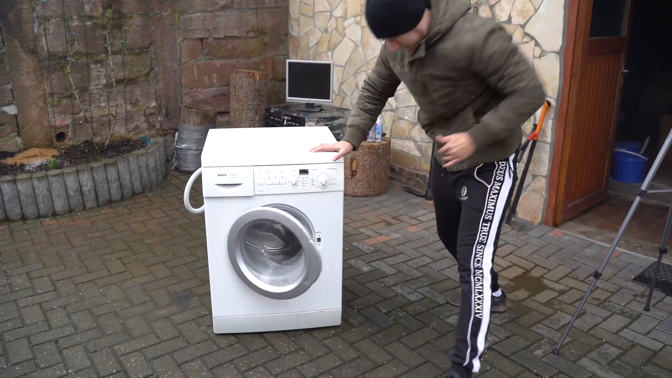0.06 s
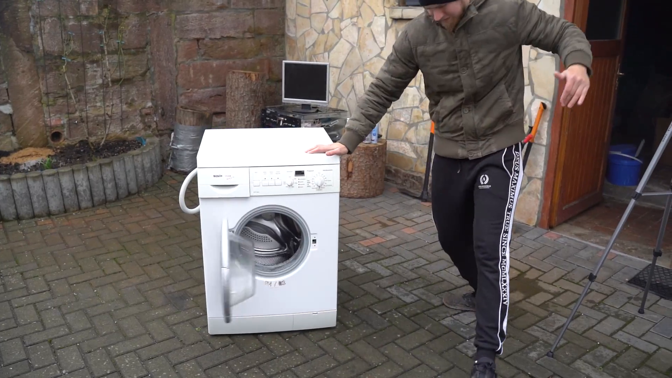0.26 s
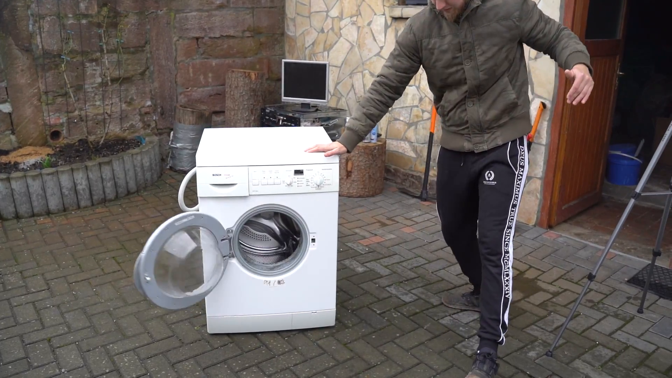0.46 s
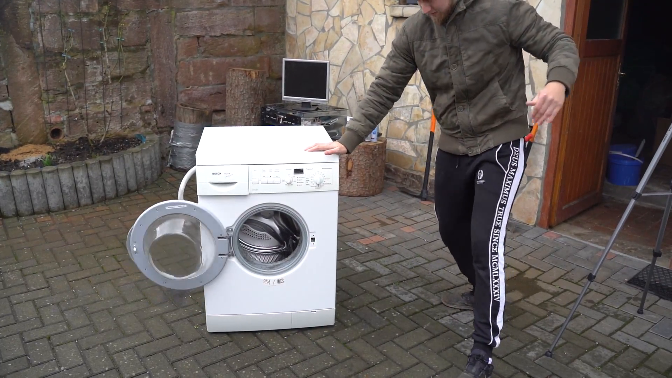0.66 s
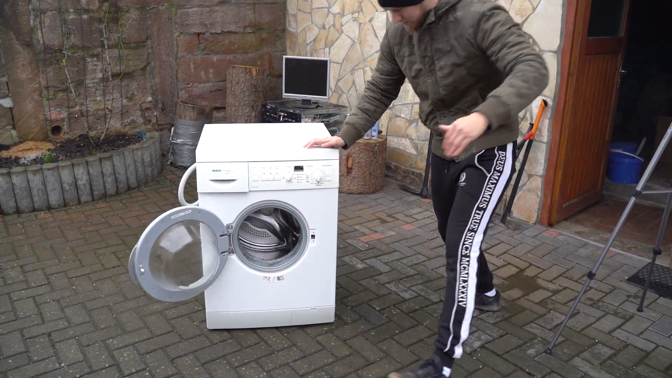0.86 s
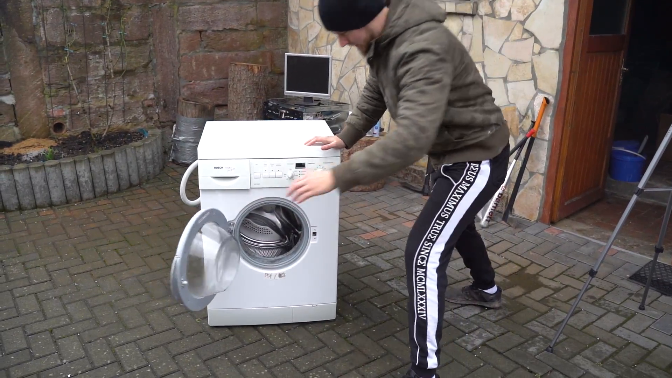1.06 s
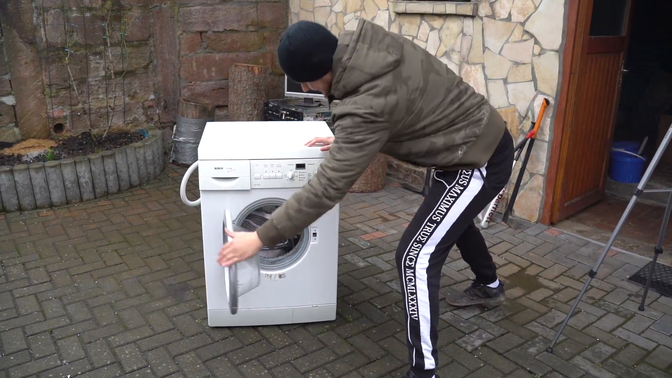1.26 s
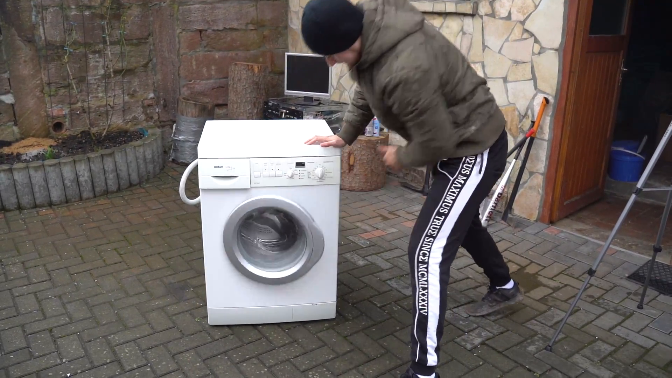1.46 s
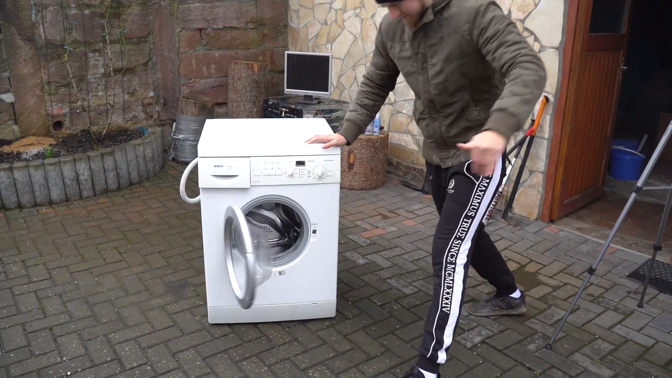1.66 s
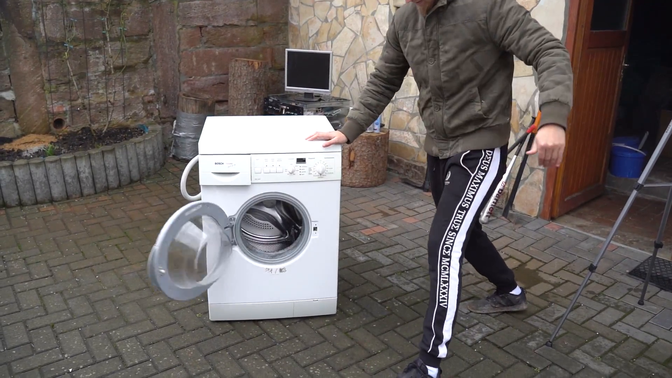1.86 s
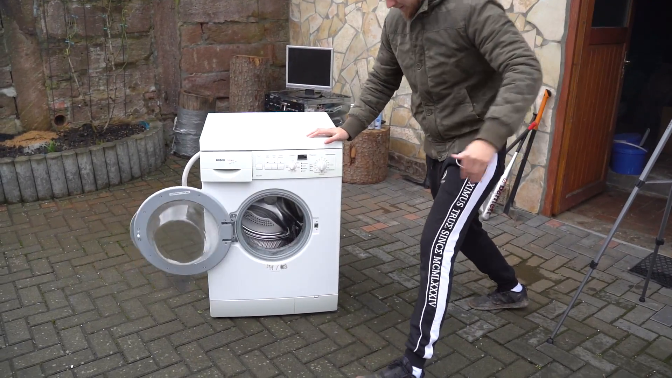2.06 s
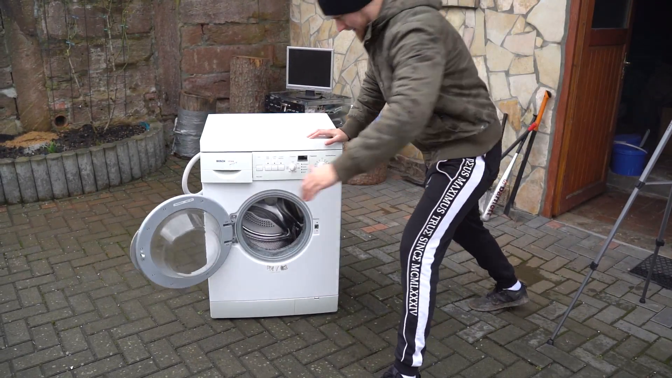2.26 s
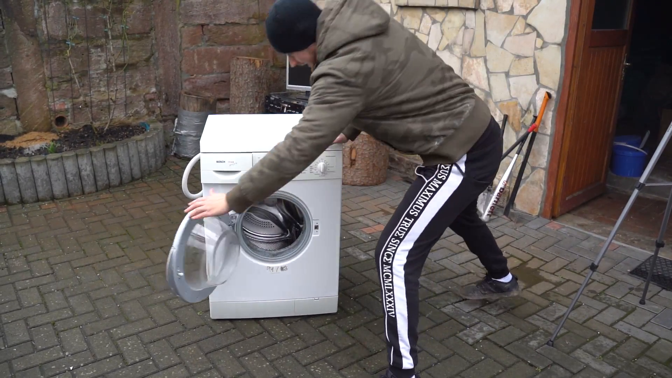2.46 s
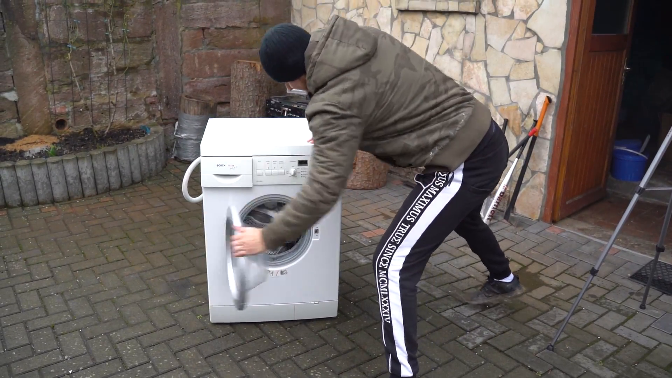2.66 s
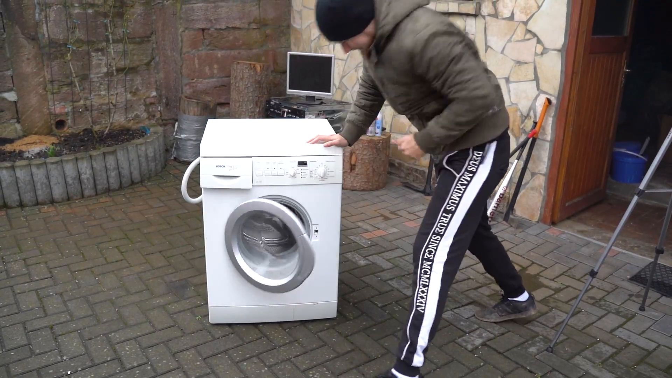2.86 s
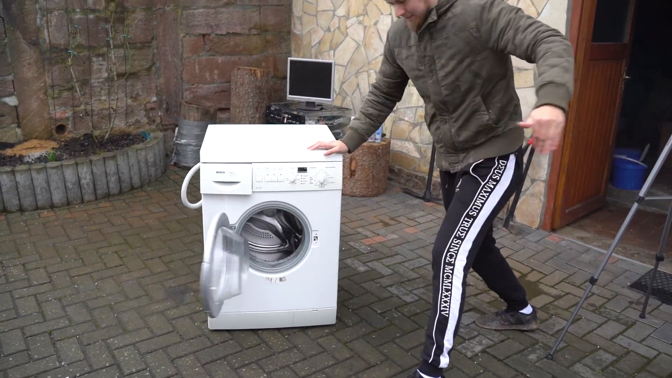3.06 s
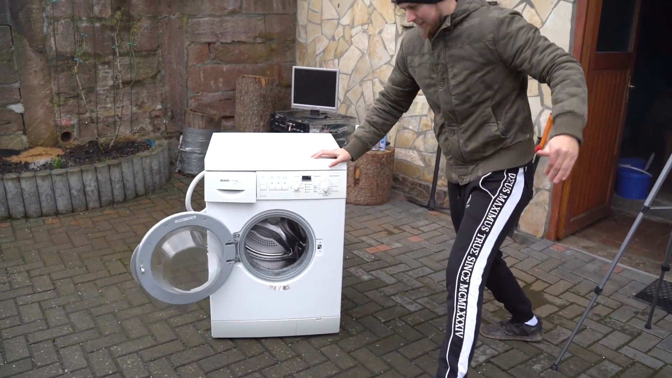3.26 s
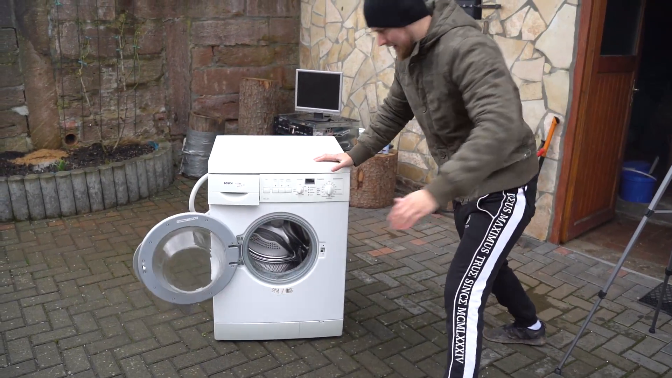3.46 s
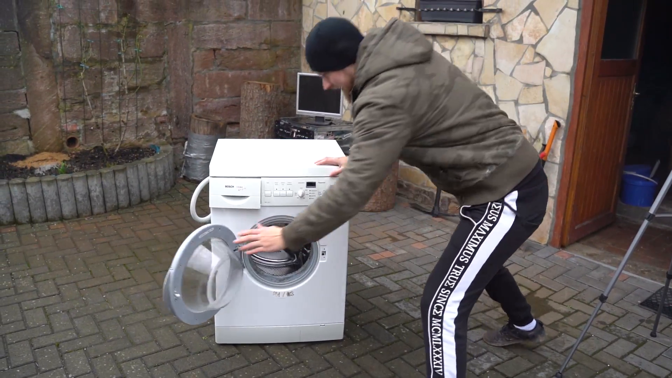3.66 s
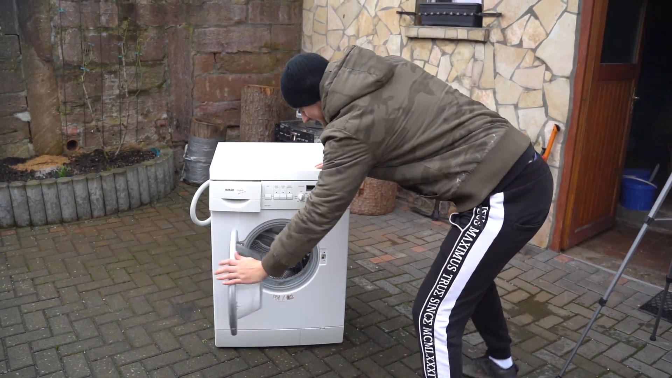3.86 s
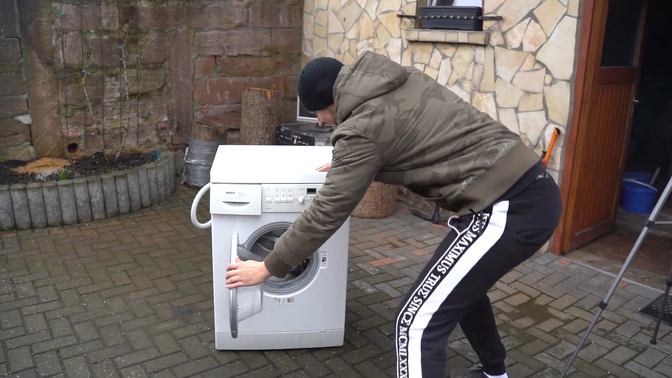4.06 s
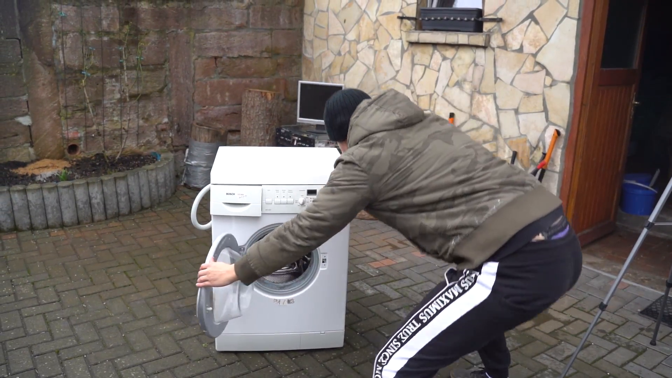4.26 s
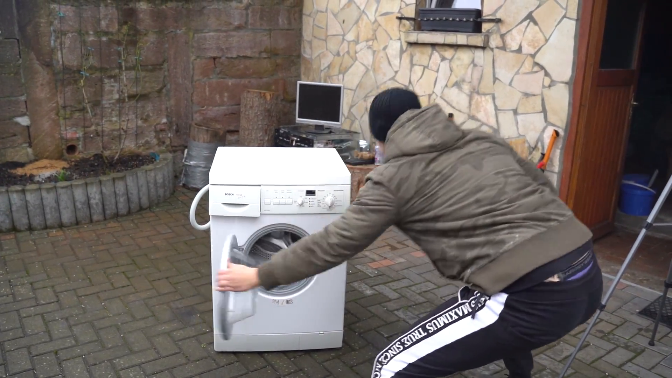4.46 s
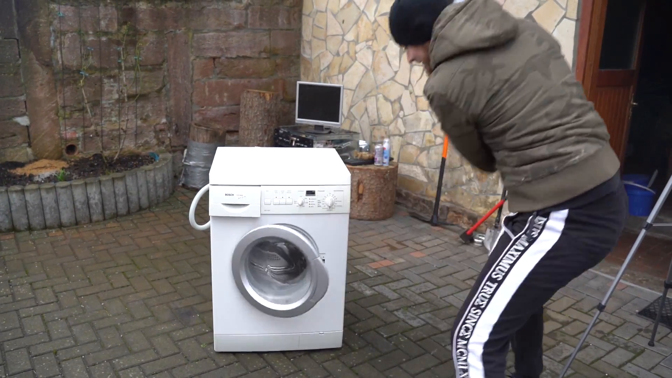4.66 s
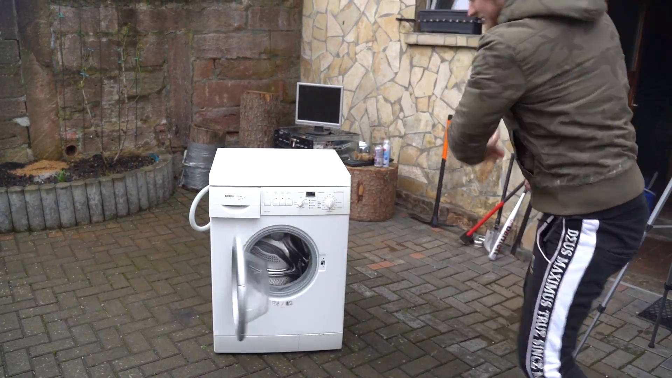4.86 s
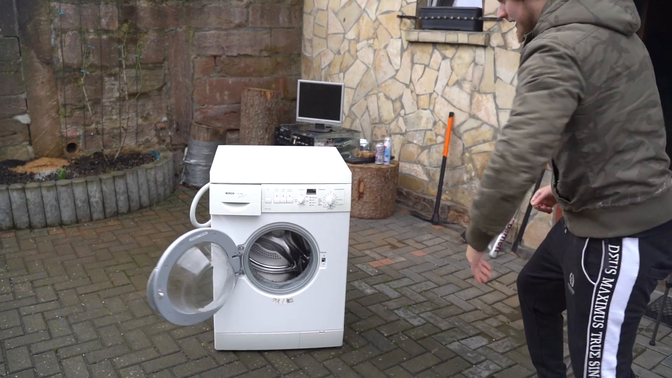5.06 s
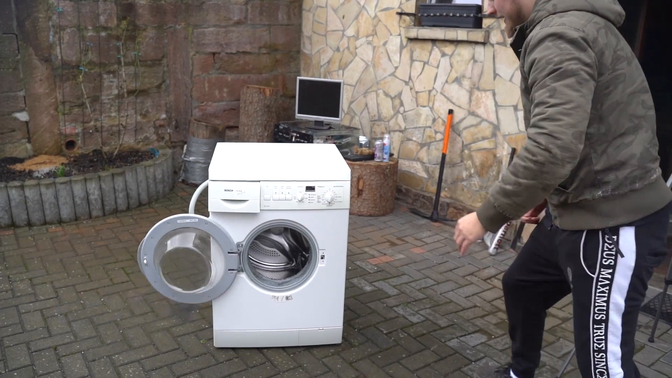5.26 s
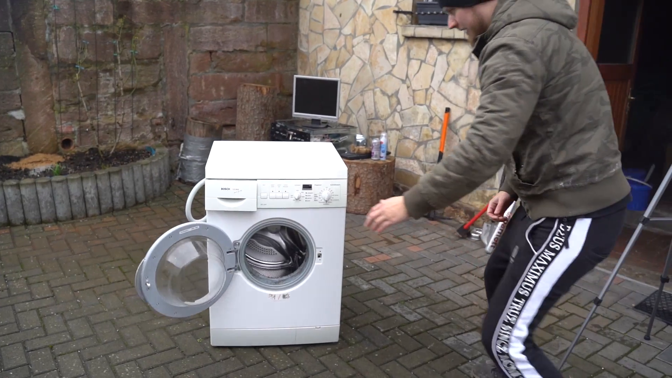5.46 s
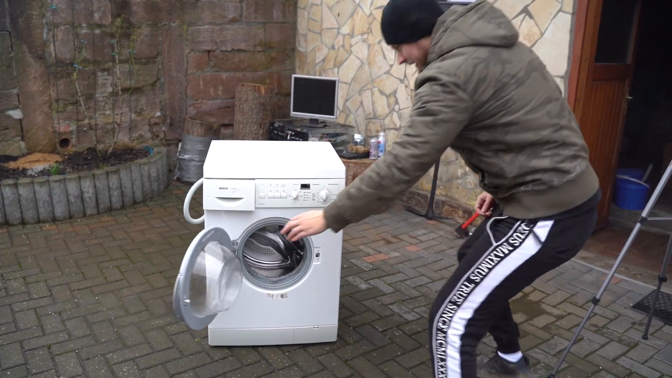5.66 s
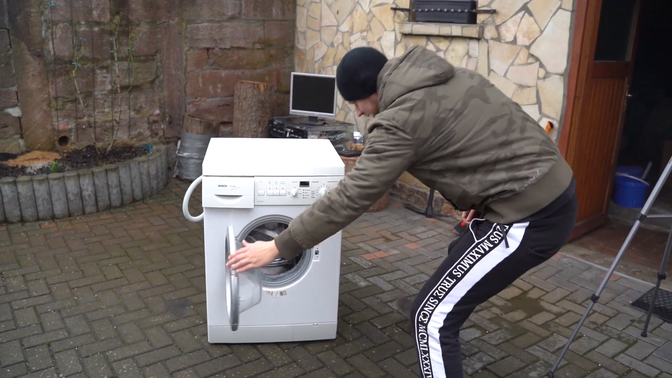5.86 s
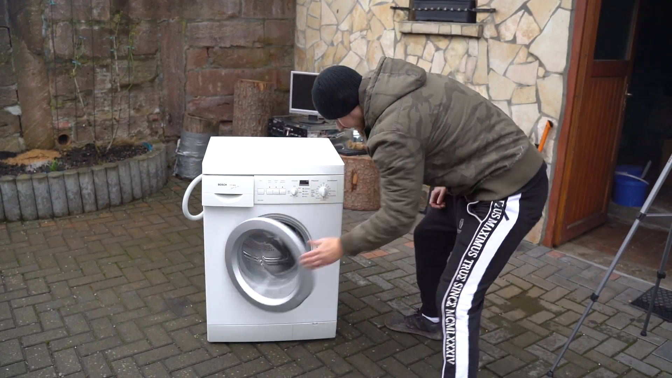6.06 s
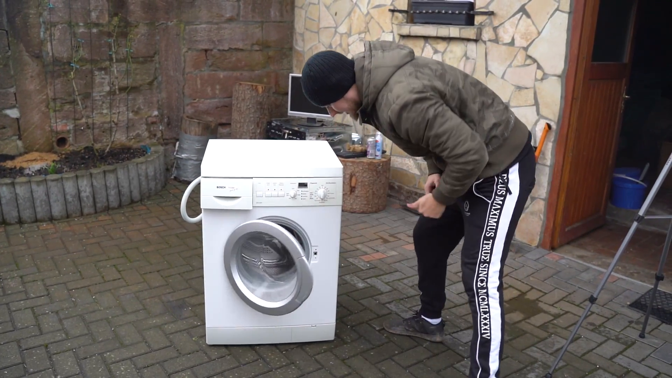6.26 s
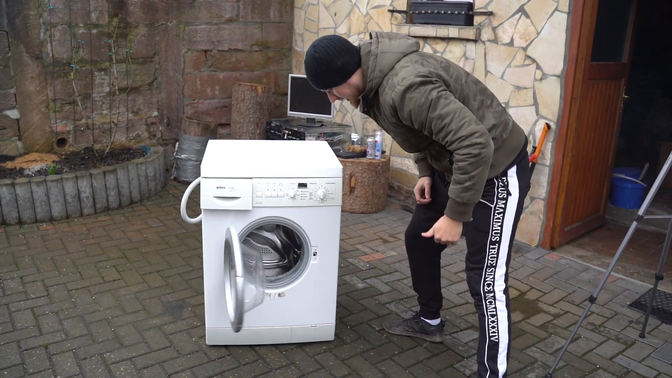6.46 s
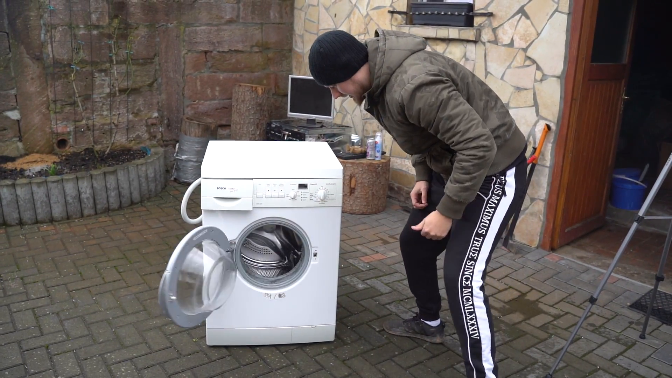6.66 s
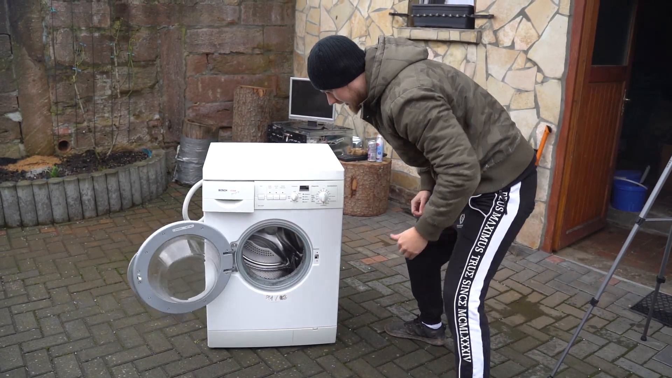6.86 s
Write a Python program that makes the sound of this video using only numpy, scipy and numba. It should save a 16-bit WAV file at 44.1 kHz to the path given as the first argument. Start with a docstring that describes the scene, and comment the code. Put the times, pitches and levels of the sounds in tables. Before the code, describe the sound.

A washing machine stands close to the stereo microphone, slightly left, in a paved yard. At once, at 0.03 s, its round door slams: sharp crack, ringing sheet metal, a swelling low boom and rattling decay of about a third of a second. Near 0.7 s the rebounding door ticks and thuds softly on its hinge stop. A dull hand contact and scuff around 1.36 s lead to the second slam at 1.49; hinge knock at 2.13. Third slam at 2.82, knock at 3.4. Faint falling bird chirps follow around 4 s. At 4.4 a rubber sole skids gritty and squeaky on the right, leaving a thin whistling ring, then a fourth, bright slam at 4.65. A weaker hinge knock comes at 5.3, rubbing at 5.66, and a clearly lighter fifth slam at 6.18, dying into faint traffic and a wavering hum until about 6.9 s.

```python
"""Washing machine door slammed in a yard

The round door is slammed by hand in a paved yard, springs back and hits its hinge stop.
Blows sum noise cracks, ringing cabinet modes, swelling low booms and a rattle of decaying noise bands.
Shoes scuff and skid (shaped noise, one thin whistling ring), small birds call (gliding sines), distant
traffic (noise) and a hum (two sines) fill the gaps; a limiter holds the slams."""
import sys
import numpy as np
from scipy import signal
from scipy.io import wavfile
from scipy.ndimage import uniform_filter1d
from numba import njit

SR = 44100
rng = np.random.default_rng(int(sys.argv[2]) if len(sys.argv) > 2 else 0)


def dump_mix(stems):
    """Bounce the given channels to the path in sys.argv[1] as a 16-bit WAV at rate SR."""
    frames = np.atleast_2d(stems).T  # one column per channel
    limited = np.clip(frames, -1, 1)  # hard clip at full scale
    pcm = np.round(limited * 32767).astype(np.int16)
    wavfile.write(sys.argv[1], SR, pcm)


N = 304290
BANDS = 32 * 2 ** np.arange(0, 9.2, 1 / 3)  # third-octave centres, f/Hz
BLIP_PEAK_S = 4000 / SR  # where a blip peaks in its own buffer

# door meets the frame: t/s, force/dB, contact sharpness re force/dB, seal squeeze/dB
DOOR_SLAMS = [(0.031, -1, 4, 2.5), (1.485, -0.5, -2, 0.5), (2.820, -0.5, 0, -1), (4.645, -2, 5, 1),
              (6.177, -7.5, 4, -5)]
# door swung wide against the hinge stop: t/s, force/dB, open-door shudder/dB, ring of door and panels/dB
HINGE_STOPS = [(0.687, 1, -19, 1), (2.127, 0.5, -18, -1), (3.401, 0, -17, -0.5), (5.292, -2.5, -21, -8)]
# thin whistles, bird peeps and one ring after the skid: t/s, length/s, first f/Hz, fall/Hz, level/dB
WHISTLES = [(0.357, .04, 6250, 0, -74), (0.426, .035, 5800, -450, -73), (0.507, .038, 5930, -250, -72),
            (0.6, .04, 5950, -200, -77), (3.57, .065, 5590, 350, -70), (4.464, 0.077, 7200, 0, -55),
            (6.81, 0.057, 7800, 100, -85)]
SKID_RING_ROW = 5  # row of WHISTLES that is the ring after the skid
TICK_DB, KNOCK_DB, KNOCK_S = -36.5, -34.5, 0.014  # stop: levels re force; knock delay after the tick
SKID_PAN_DB = -4.5  # left minus right: skids lie right of the microphone


def undb(db):
    """Amplitude factor of a level in dB."""
    return np.exp(np.asarray(db) * np.log(10) / 20)


def unit(x):
    """Scale to rms 1."""
    return x / np.sqrt(np.mean(x ** 2))


def add(out, s, x):
    """Mix x into out from s seconds on."""
    i = int(s * SR)
    i, x = max(i, 0), x[..., max(-i, 0):]
    out[..., i:i + x.shape[-1]] += x[..., :out.shape[-1] - i]


def left_right(pan_db):
    """Column of channel levels in dB, left minus right = pan_db."""
    return np.array([[pan_db], [-pan_db]]) / 2


def band(hz, width_hz, like, size=N, order=2):
    """Stereo noise band, rms 1; its channels correlate by the share like (0-1)."""
    edges_hz = np.clip([hz - width_hz / 2, hz + width_hz / 2], 15, 20000)
    bandpass = signal.butter(order, edges_hz, "band", fs=SR, output="sos")
    mid, side = signal.sosfilt(bandpass, rng.standard_normal((2, size)))
    like = np.clip(like, 0, 1)
    return unit(np.sqrt(1 + like) * mid + np.sqrt(1 - like) * side * np.array([[1], [-1]]))


def swell(rise_s, t60_s, size):
    """Envelope with an exponential rise and a 60 dB fall per t60; top 1."""
    t = np.arange(size) / SR
    e = (1 - np.exp(-t / rise_s)) * np.exp(-np.log(1000) * t / t60_s)
    return e / e.max()


def walk(rate_hz, size=N):
    """Random levels held 1 / rate and smoothed twice; rms 1."""
    k = int(SR / rate_hz)
    steps = np.repeat(rng.standard_normal(size // k + 1), k)
    return unit(uniform_filter1d(uniform_filter1d(steps, k), k)[:size])


def by_band(table, column):
    """One column of a (f/Hz, ..) table interpolated over log f at the band centres."""
    table = np.array(table)
    return np.interp(np.log(BANDS), np.log(table[:, 0]), table[:, column])


def traffic():
    """Noise bands that swell together and flicker alone; the lows are near mono."""
    # spectrum: f/Hz, relative density/dB per Hz
    spectrum = [(15, -35), (25, -5.5), (62, -7), (88, -14), (123, -8.5), (195, -16.5), (263, -9.5),
                (439, -15.5), (531, -13), (641, -11.5), (1070, -11), (3080, -29.5), (7110, -38),
                (16000, -55)]
    # overall: t/s, level/dB
    course = [(0, -53), (4, -56.5), (6.9, -59.5)]
    out, slow = np.zeros((2, N)), walk(0.8)
    for hz, density_db in zip(BANDS, by_band(spectrum, column=1)):
        level = undb(density_db + 0.32 * slow + 1.3 * walk(8.7)) * np.sqrt(hz)  # density to band level
        out += level * band(hz, 0.23 * hz, 1 - hz / 1200)
    return unit(out) * undb(np.interp(np.arange(N) / SR, *np.transpose(course)))


def hum():
    """Distant fundamental and octave, wavering in pitch and level."""
    # t/s, fundamental level/dB, octave level/dB
    course = [(0, -65.5, -74), (1.2, -63, -86), (3.6, -84.5, -72), (4.0, -83, -67.5), (4.6, -72, -62),
              (5.3, -74, -79), (5.9, -64, -78.5), (6.5, -68, -79), (6.9, -66.5, -74.5)]
    t = np.arange(N) / SR
    s, low_db, high_db = np.transpose(course)
    phase = 2 * np.pi * np.cumsum(268.6 * (1 + 0.008 * walk(22))) / SR
    out = np.zeros(N)
    for k, db in ((1, low_db), (2, high_db)):
        out += undb(np.interp(t, s, db) + 0.83 * walk(14)) * np.sin(k * phase)
    return np.sqrt(2) * out  # dB are rms


def seal(squeeze_db):
    """Rubber seal rubs (noise), then shuts as the drum air kicks back (one windowed low swing)."""
    rub_db, puff_db = -38.5, -17.5  # re squeeze
    out = np.zeros((2, 2000))
    add(out, 0, undb(squeeze_db + rub_db) * band(1300, 1100, 0.6, size=1500) * swell(0.004, 1.2, size=1500) ** 2)
    puff = -np.sin(2 * np.pi * np.arange(560) / 480) * np.hanning(560)
    add(out, 0.0205, undb(squeeze_db + puff_db) * puff)
    return out


def crack(db, hz, width_hz):
    """Hard contact: a noise band lasting a few milliseconds."""
    return undb(db) * band(hz, width_hz, 0.29, size=2000) * swell(0.0006, 0.009, size=2000)


def cabinet(db, contact_s, chatter_t60_s):
    """Panel modes ring after a push and the loose knocks that follow; each channel hears its own mix."""
    # cabinet panels, door ring and glass: f/Hz, level/dB, t60/s
    modes = [(43.3, -19, 0.3), (67.8, -10.5, 0.55), (99, -3, 0.22), (148.4, -5.5, 0.48), (185, -6.5, 0.26),
             (252, -10, 0.12), (268.6, -6.5, 0.29), (323.8, -6.5, 0.34), (334.9, -4.5, .2),
             (366.7, -2, 0.2), (387.5, -8.5, .16), (594, -17, 0.16), (724, -12, 0.1), (789.4, -7, 0.31),
             (1210, -14.5, 0.35), (1470, -15.5, .15), (1920, -16.5, .15), (2260, -12.5, .12),
             (2950, -20.5, .12), (3670, -21.5, .12), (4410, -23, .1), (5274, -25.5, .1), (7010, -25, .08)]
    hz, mode_db, t60_s = np.transpose(modes)[:, :, None]
    chance = rng.standard_normal((3, len(hz), 1))  # level, phase, place
    t = np.arange(SR // 2) / SR
    spread = np.minimum(hz / 900, 1.6) * chance[2]  # small parts sound from different places
    drift = 0.05 * np.cumsum(rng.standard_normal((len(hz), len(t))), axis=1)  # loose joints blur each pitch
    fade = undb(mode_db + chance[0] - 60 * t / t60_s)
    phase = 2 * np.pi * hz * t + 9 * chance[1] + drift
    ring = [(fade * np.sin(phase + side * spread)).sum(axis=0) for side in (0.5, -0.5)]
    hits = rng.random(len(t)) < 250 / SR  # 250 knocks per second
    knocks = hits * rng.standard_normal(len(t)) * 10 ** (-3 * t / chatter_t60_s)
    knocks[0] = 2.5  # the push itself
    push = np.hanning(int(contact_s * SR) + 3)
    force = np.convolve(knocks / np.sqrt(np.sum(knocks ** 2)), push / push.sum())
    return undb(db) * signal.fftconvolve(ring, force[None], axes=1)


def boom(db, hz, peak_s, sharp):
    """Wavering tone fed by the blow, peaks late and dies; the walls shift its phase between channels."""
    u = np.arange(SR // 2) / SR / peak_s
    phase = 2 * np.pi * np.cumsum(hz * (1 + 0.045 * walk(35, size=len(u)))) / SR
    apart = 0.094 * walk(20, size=len(u)) * np.array([[1], [-1]])
    level = undb(db + 2.2 * walk(45, size=len(u)))
    return level * np.sin(phase + apart) * (u * np.exp(1 - u)) ** sharp


def slams():
    """Door on frame: seal, hard crack, ringing panels, then booms of drum air and walls."""
    # air in the drum, then the walls: peak delay/s, f/Hz, level re drum/dB, sharpness
    swells = [(0.018, 105.5, 3.5, 1.6), (0.071, 159, -10, 4.5), (.04, 290, -9, 2.4), (0.1, 110, -19, 5.3)]
    crack_db, panels_db, drum_db = 9, -4, -0.8  # re force
    out = np.zeros((2, N))
    for s, force_db, sharp_db, squeeze_db in DOOR_SLAMS:
        add(out, s - 0.033, seal(squeeze_db))
        add(out, s, crack(force_db + sharp_db + crack_db, 2400, 3600))
        add(out, s, crack(force_db + sharp_db + crack_db - 10, 9800, 12000))
        add(out, s, cabinet(force_db + panels_db, 0.0002, 0.33))
        for peak_s, hz, db, sharp in swells:
            add(out, s, boom(force_db + drum_db + db, hz, peak_s, sharp))
    return out


def blip(db, hz, length_s, steep=1):
    """A cosine under a bell envelope, peak at BLIP_PEAK_S; steep shortens the rise."""
    t = np.arange(-4000, 4000) / SR
    bell = np.exp(-(2 * t * np.where(t < 0, steep, 1) / length_s) ** 2)
    return undb(db) * np.cos(2 * np.pi * hz * t) * bell


def stops():
    """Hinge stop: thin tick, dull knock, shudder of the open door, weaker rebound."""
    flap_s, rebound_s = 0.055, 0.155  # after the tick
    shake_db, rebound_db, flap_hz = -26.5, -16, 100.2  # re force, re shudder
    out = np.zeros((2, N))
    for s, force_db, shudder_db, ring_db in HINGE_STOPS:
        knock_db, body_db = force_db + KNOCK_DB, force_db + shake_db
        add(out, s, crack(force_db + TICK_DB + 8, 3600, 3100))
        add(out, s + 0.02 - BLIP_PEAK_S, blip(body_db - 3, 80, 0.039))  # the hinge takes the load
        add(out, s + KNOCK_S, crack(knock_db + 11, 3350, 3500))
        add(out, s + KNOCK_S, cabinet(body_db, 0.0018, 0.28))
        add(out, s + KNOCK_S, boom(knock_db + ring_db + 9, 366, 0.0055, 0.67))  # the hollow door ring
        add(out, s + flap_s - BLIP_PEAK_S, blip(shudder_db, flap_hz, 0.053, steep=2))
        add(out, s + flap_s - 0.016, cabinet(body_db + ring_db + 2.5, 0.002, 0.2))  # shaken panels
        add(out, s + rebound_s - BLIP_PEAK_S, blip(shudder_db + rebound_db, 1.056 * flap_hz, 0.045))
    return out


def rattle():
    """Loose parts and yard echoes: noise bands set off by every blow, each dying at its own pace."""
    # f/Hz, level per band/dB, t60/s, left-right likeness (0-1)
    decay = [(50, -29, 0.65, 0.99), (94, -15, 0.46, 0.98), (195, -10, 0.39, 0.95), (474, -11.5, 0.35, 0),
             (1000, -7, .28, 0.7), (2040, -6.5, 0.3, .2), (4500, -10, 0.32, 0), (7960, -9, 0.26, 0.02),
             (15000, -14, 0.2, 0)]
    yard_db, yard_longer = -33, 1.605  # late echoes: level, t60 factor
    treble_left_db = 1  # the near wall sends more treble to the left
    # blows: t/s, level/dB, low cut/dB per octave, treble cut/dB per octave, t60 factor
    blows = [(s, force_db - 0.5, 0, 0, 1) for s, force_db, _, _ in DOOR_SLAMS]
    for s, force_db, _, _ in HINGE_STOPS:
        blows.append((s, force_db + TICK_DB, 4, 1.5, 0.6))
        blows.append((s + KNOCK_S, force_db + KNOCK_DB, -1, 2.5, 0.8))
    out, clatter = np.zeros((2, N)), walk(150)
    for hz, db, t60_s, like in zip(BANDS, *(by_band(decay, column=k) for k in (1, 2, 3))):
        envelope = np.zeros(N)
        for s, blow_db, thin_db, dull_db, short in blows:
            tilt_db = thin_db * min(np.log2(hz / 2000), 0) - dull_db * max(np.log2(hz / 4000), 0)
            near = swell(0.00032 + 0.88 / hz, short * t60_s, size=30000)  # lows come late
            late = undb(yard_db) * swell(0.02, yard_longer * short * t60_s, size=30000)
            add(envelope, s, undb(blow_db + tilt_db + db) * (near + late))
        lean_db = left_right(treble_left_db * (hz > 6000))
        flicker = undb(1.1 * clatter + 1.5 * walk(60) + lean_db)
        out += envelope * flicker * band(hz, 0.25 * hz, like)
    return out


def door():
    """All door blows; the left channel leads, as the machine stands a little left of the microphone."""
    out = slams() + stops() + rattle()
    out[0] = np.roll(out[0], -2)
    return out


def scrape(db, hz, width_hz, rise_s, t60_s, pan_db):
    """Friction: a noise band with a grainy level."""
    grain = undb(db + 2 * walk(300, size=20000) + left_right(pan_db))
    return grain * band(hz, width_hz, 0.3, size=20000, order=3) * swell(rise_s, 2 * t60_s, size=20000) ** 2


def scuffs():
    """Light rubbing of shoes, hands and cloth: broad scrapes."""
    # t/s, level/dB, centre f/Hz, t60/s, left minus right/dB
    rubs = [(0.334, -58.5, 11500, 0.093, -3), (0.385, -64, 11100, 0.17, -3), (0.585, -75, 12000, .08, 0),
            (1.069, -67, 8000, .08, -4), (1.352, -54.5, 2820, 0.085, 2.5), (2.369, -64, 5050, 0.046, -1),
            (2.499, -67, 7000, 0.37, -1), (4.005, -73.5, 7890, .16, -2), (4.359, -59.5, 6990, 0.92, -6.5),
            (5.659, -55, 7000, .18, -3), (6.033, -66, 4000, 0.11, 1.5)]
    out = np.zeros((2, N))
    for s, db, hz, t60_s, pan_db in rubs:
        add(out, s, scrape(db, hz, min(1.5 * hz, 8550), 0.035 * t60_s, t60_s, pan_db))
    return out


def whistle(length_s, first_hz, fall_hz, db):
    """Thin, slightly hoarse sine whose glide speeds up towards the end, blurred by faint echoes."""
    u = np.linspace(0, 1, int(length_s * SR))
    hz = (first_hz - fall_hz * u ** 1.8) * (1 + 0.012 * walk(300, size=len(u)))
    envelope = np.sin(np.pi * u ** 0.67) ** 0.38 * undb(3.3 * walk(90, size=len(u)))
    tone = np.sin(2 * np.pi * np.cumsum(hz) / SR) * envelope
    echoes = 0.049 * rng.standard_normal((2, 3000)) * swell(0.003, 0.1, size=3000)
    echoes[:, 0] = 1  # direct sound
    return undb(db) * signal.fftconvolve(echoes, tone[None], axes=1)


def birds():
    """Small birds: falling chirps and thin peeps, all whistles."""
    # falling chirps: t/s, length/s, level/dB
    chirps = [(3.95, .04, -77), (4.09, .045, -78.5), (4.225, .06, -75.5), (5.6, .05, -84),
              (5.786, .05, -80)]
    chirp_hz, sag_hz_per_s = 7500, 32000
    out = np.zeros((2, N))
    for s, length_s, db in chirps:
        add(out, s, whistle(length_s, chirp_hz, sag_hz_per_s * length_s, db))
    for row, (s, *settings) in enumerate(WHISTLES):
        if row != SKID_RING_ROW:
            add(out, s, whistle(*settings))
    return out


def thuds():
    """Dull contacts of hand and foot: a few clear cycles, then a blurred ring of narrow noise."""
    # t/s, level/dB, f/Hz, t60/s
    contacts = [(0.968, -31.5, 343, 0.027), (1.359, -28.5, 287, .12), (1.378, -28.5, 270, .15),
                (1.395, -30, 130.2, .15), (1.417, -32.5, 166.4, .25), (2.63, -46.5, 65, .8),
                (3.213, -49, 198, 0.059), (5.66, -46.5, 300, 0.058), (6.06, -45, 270, .08),
                (6.825, -52, 397, .05)]
    cycles, tail_db = 1.9, -10
    out = np.zeros((2, N))
    for s, db, hz, t60_s in contacts:
        add(out, s - BLIP_PEAK_S, blip(db, hz, cycles / hz))
        ring = band(hz, 0.73 * hz, 1, size=SR // 2) * swell(1 / hz, t60_s, size=SR // 2)
        add(out, s, undb(db + tail_db) * ring)
    return out


def skids():
    """Rubber sole skids on paving: squeal and grit scrapes, with short sharp clicks near 2 kHz."""
    # t/s, level/dB, squeal f/Hz, rise/s, squeal t60/s, grit t60/s
    slides = [(4.411, -31.5, 2050, 0.017, 0.25, 0.21), (4.596, -40.5, 1455, .002, .3, 0.12)]
    # grit under the sole: f/Hz, width/Hz, level re squeal/dB
    grit = [(2800, 1000, -4), (4500, 3500, -6.5), (8500, 17000, -12)]
    # t/s, level/dB, f/Hz
    clicks = [(4.4245, -28, 1810), (4.4305, -15.5, 1940), (4.44, -16.5, 2200), (4.601, -28, 2400),
              (4.602, -39.5, 4710)]
    out = np.zeros((2, N))
    for s, db, hz, rise_s, t60_s, grit_t60_s in slides:
        add(out, s, scrape(db, hz, 0.5 * hz, rise_s, t60_s, SKID_PAN_DB))
        for grit_hz, width_hz, grit_db in grit:
            add(out, s, scrape(db + grit_db, grit_hz, width_hz, 1.26 * rise_s, grit_t60_s, SKID_PAN_DB))
    for s, db, hz in clicks:
        add(out, s - BLIP_PEAK_S, blip(db, hz, 0.0023) * undb(left_right(SKID_PAN_DB)))
    return out


def skid_ring():
    """Thin whistling ring after the skid."""
    out = np.zeros((2, N))
    s, *settings = WHISTLES[SKID_RING_ROW]
    add(out, s, whistle(*settings))
    return out


def scene():
    """Sum of all sources."""
    return traffic() + hum() + door() + scuffs() + birds() + thuds() + skids() + skid_ring()


@njit
def follow(x, attack, release):
    """Envelope that rises fast and lets go slower."""
    e, out = 1e-9, np.empty(len(x))
    for i in range(len(x)):
        e += (x[i] - e) * (attack if x[i] > e else release)
        out[i] = e
    return out


def record(dry):
    """Limiter linked over both channels with 1 ms look-ahead, soft clip, bass roll-off, treble cut-off."""
    limit_db, ratio, attack_s, release_s = -13.5, 4.9, 0.00054, 0.0077
    bass_hz, top_hz = 38.6, 16200
    e = follow(np.abs(dry).max(axis=0), min(1 / (attack_s * SR), 1.0), 1 / (release_s * SR))
    gain = np.minimum(undb(limit_db) / np.roll(e, -44), 1) ** (1 - 1 / ratio)
    clipped = np.tanh(1.099 * dry * gain) / 1.11
    held = signal.sosfilt(signal.butter(4, bass_hz, "high", fs=SR, output="sos"), clipped)
    return signal.sosfilt(signal.ellip(10, 0.2, 80, top_hz, fs=SR, output="sos"), held)


dry = scene()
out = record(dry)
dump_mix(out)
```